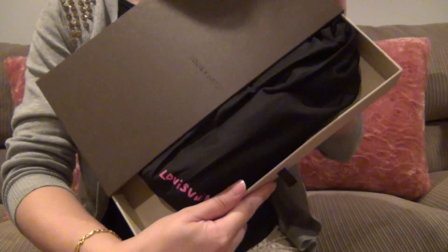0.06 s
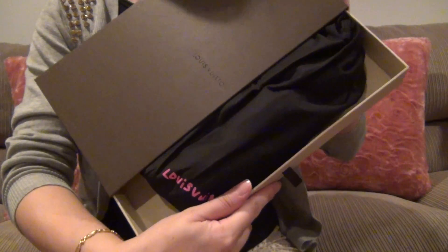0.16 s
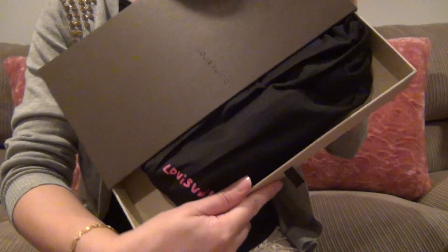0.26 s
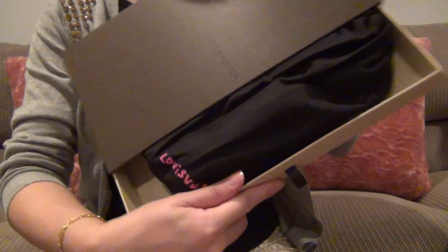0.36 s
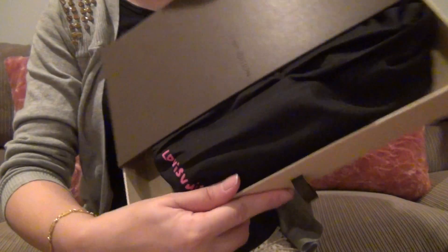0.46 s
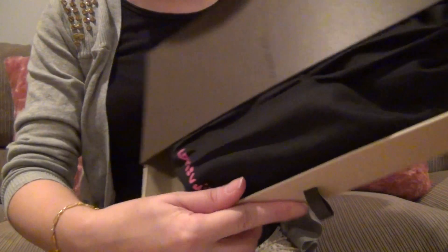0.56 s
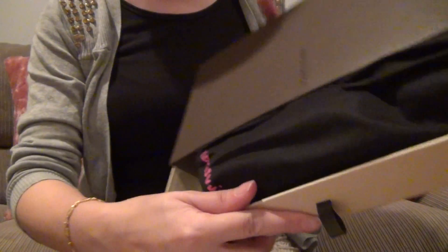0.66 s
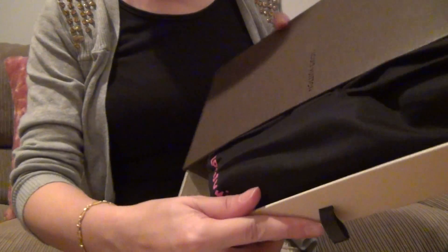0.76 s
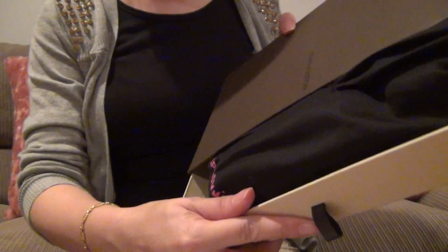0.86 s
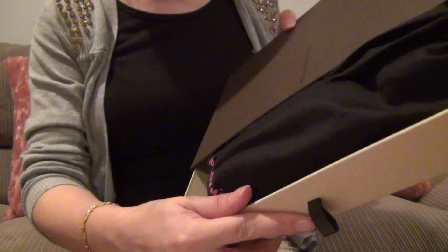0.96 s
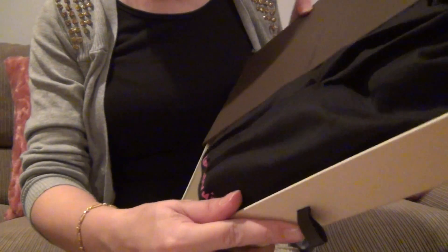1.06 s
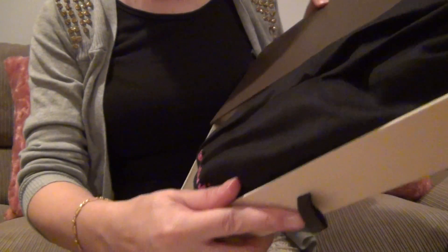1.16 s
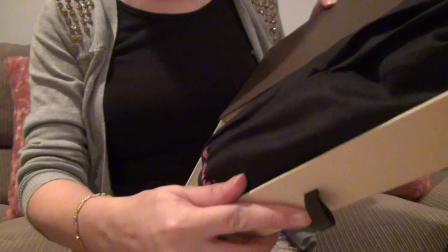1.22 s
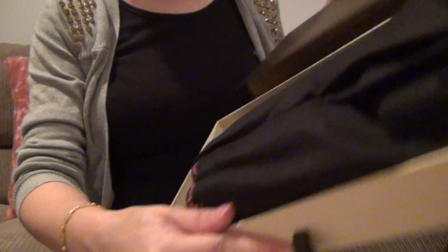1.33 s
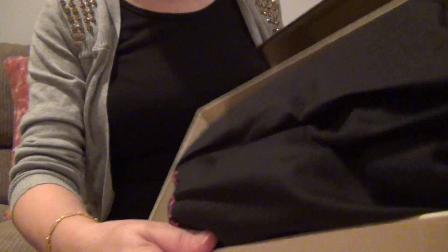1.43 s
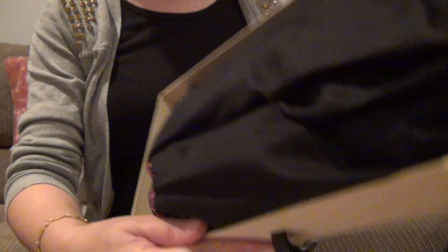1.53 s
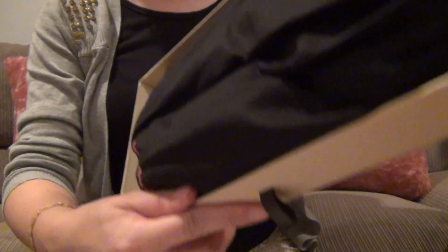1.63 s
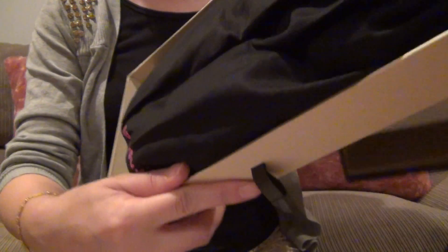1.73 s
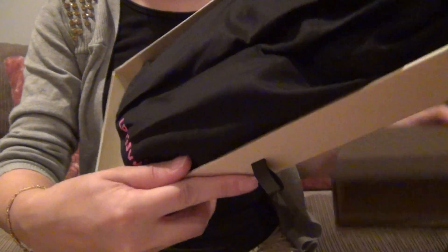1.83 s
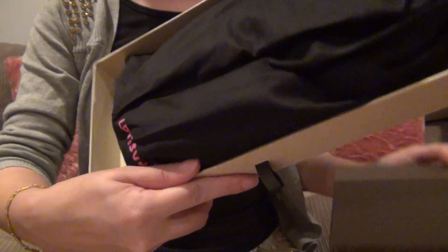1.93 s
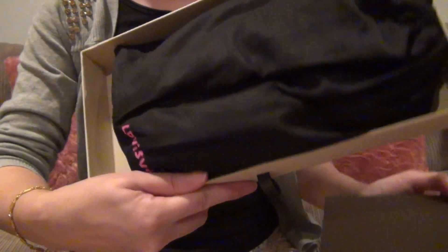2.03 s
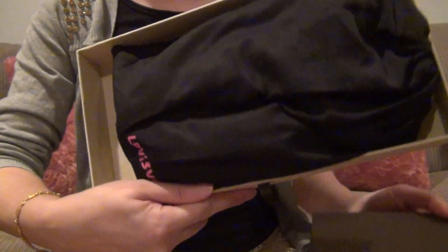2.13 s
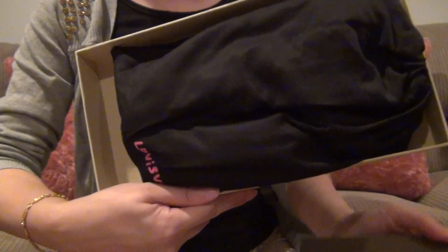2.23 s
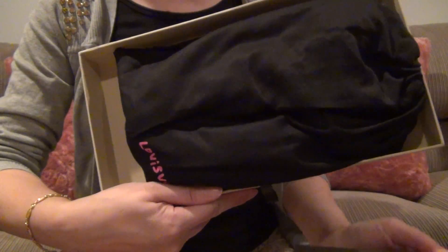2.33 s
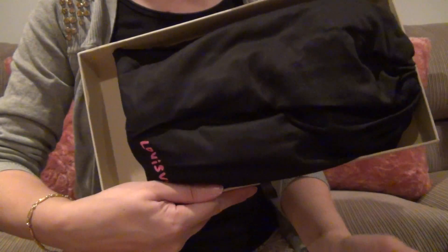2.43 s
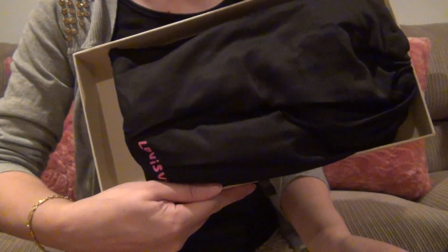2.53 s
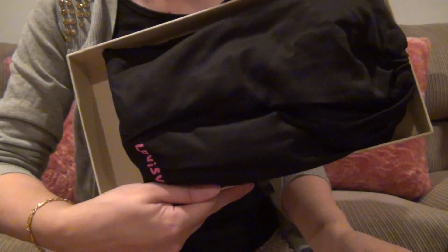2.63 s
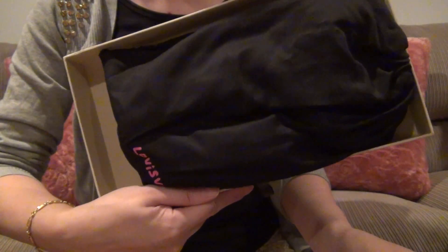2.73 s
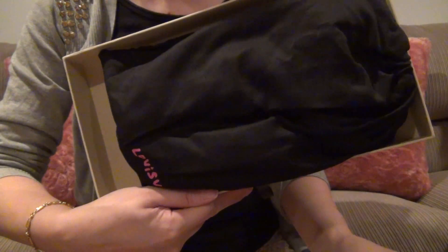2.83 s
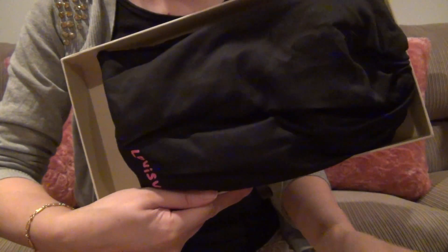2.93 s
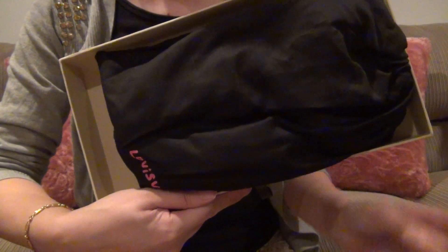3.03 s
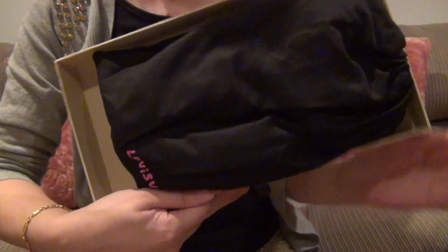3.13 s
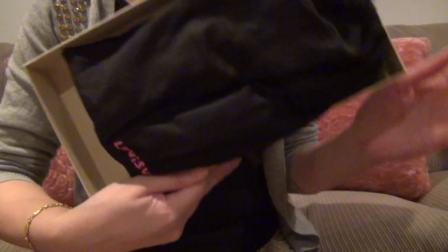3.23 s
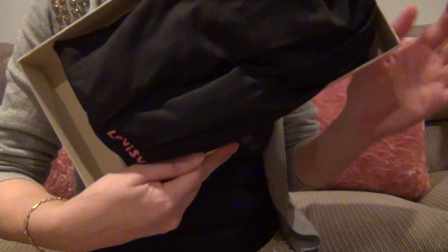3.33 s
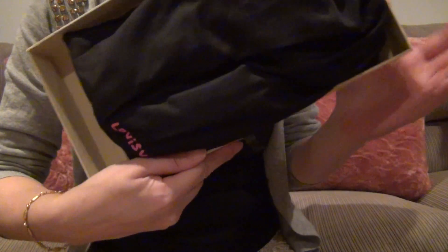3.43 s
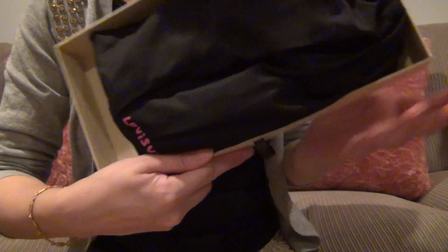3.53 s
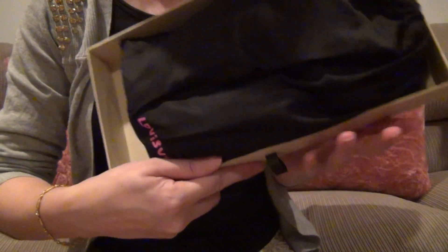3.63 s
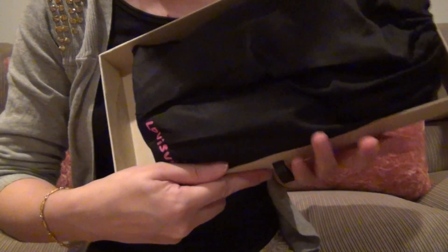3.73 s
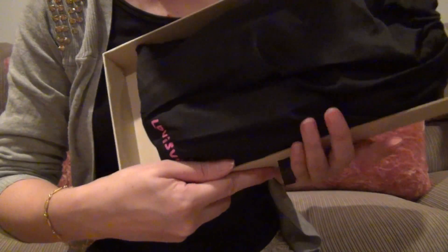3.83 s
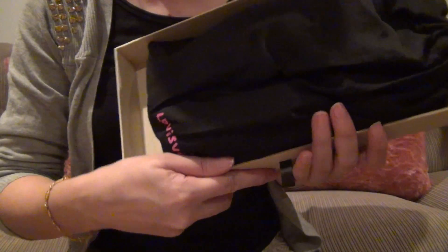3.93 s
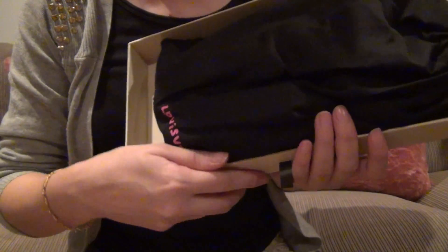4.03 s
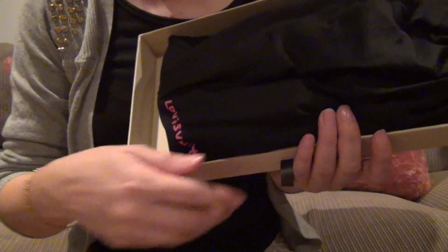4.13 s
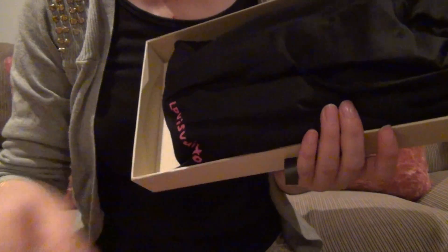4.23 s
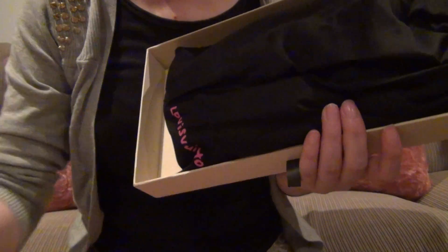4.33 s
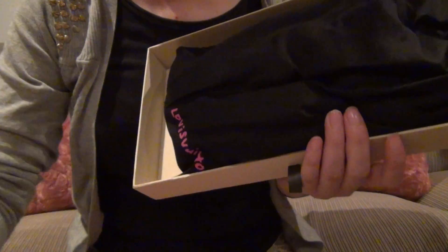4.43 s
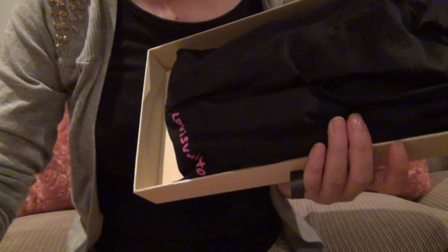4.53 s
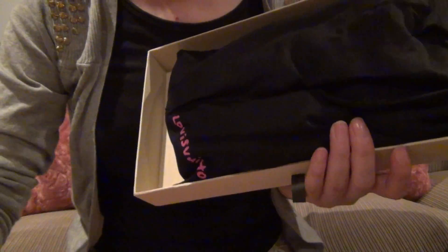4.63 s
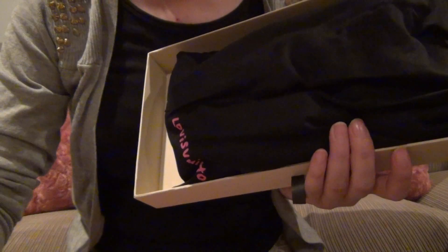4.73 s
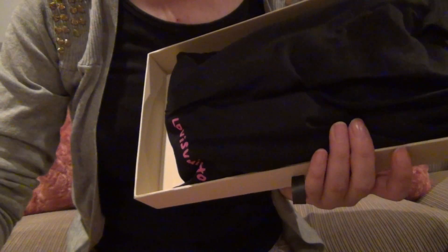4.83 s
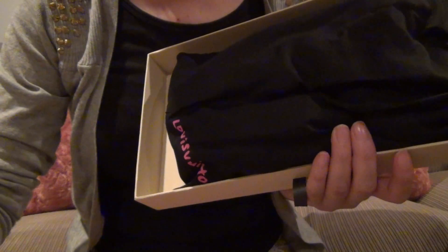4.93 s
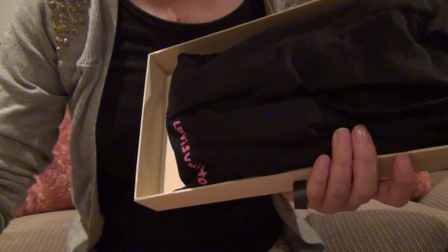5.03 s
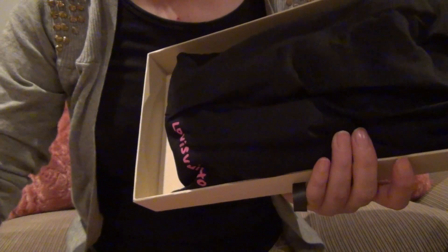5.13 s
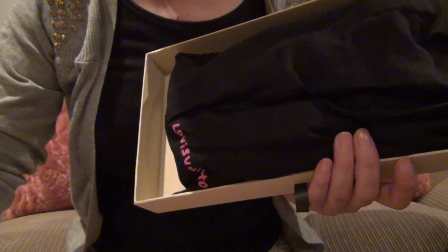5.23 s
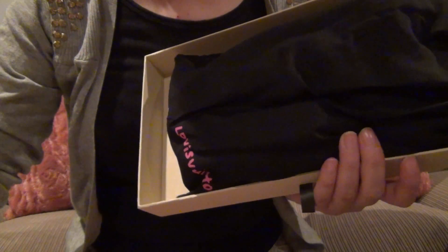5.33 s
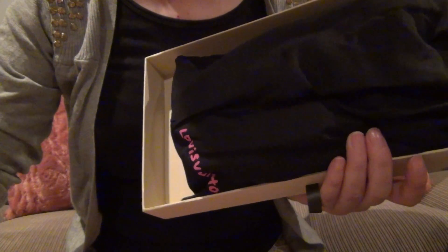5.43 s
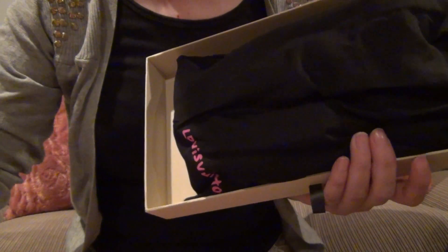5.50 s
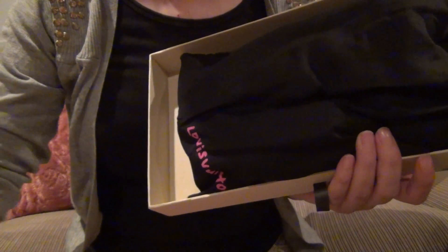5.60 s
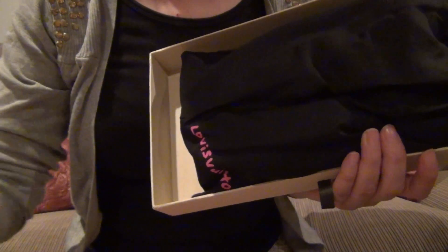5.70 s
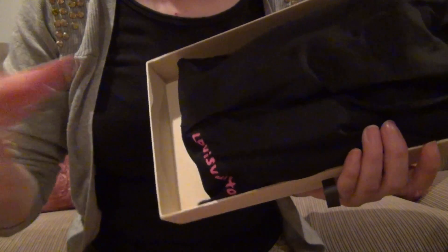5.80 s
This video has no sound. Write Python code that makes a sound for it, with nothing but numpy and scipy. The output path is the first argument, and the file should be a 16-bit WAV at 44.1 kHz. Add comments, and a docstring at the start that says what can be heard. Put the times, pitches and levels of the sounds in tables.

```python
"""Fingers tap and rub a cardboard box on a lap; its lid slides off, is set down, rocks and drops; a sleeve brushes cloth.
Behind this a fan hums faintly and the microphone hisses in a quiet furnished room.
Taps and knocks ring the modes of box and lid, with a short noise crack on top.
Rubbing and cloth are crowds of tiny random clicks, coloured by filters and shaped stroke by stroke.
Feedback delays give the room echo; the background is coloured noise with narrow whines."""
import sys
import numpy as np
from scipy import signal
from scipy.fft import rfft, irfft, next_fast_len
from scipy.io import wavfile

SR = 44100
rng = np.random.default_rng(int(sys.argv[2]) if len(sys.argv) > 2 else 0)


def waveform_to_disk(signal):
    """Save audio, clipped to [-1, 1], as 16-bit WAV at the path in sys.argv[1]."""
    frames = np.transpose(np.atleast_2d(signal))
    scaled = np.clip(frames, -1, 1) * 32767
    samples = np.round(scaled).astype(np.int16)
    wavfile.write(sys.argv[1], SR, samples)


N = 258426  # length in samples
GAIN_STEP = 32  # samples between the points of a stroke's gain curve


def from_db(db):
    """Gain of a level in dB."""
    return 10 ** (np.asarray(db) / 20)


def rms_one(x):
    """Scale to unit rms, the usual measure of average strength."""
    return x / np.sqrt(np.mean(x ** 2) + 1e-20)


def coloured(x, points):
    """Shape a steady signal by a spectrum of (f/Hz, level/dB) points; rms 1."""
    size = next_fast_len(N)
    hz = np.maximum(np.arange(size // 2 + 1) * SR / size, 1)
    point_hz, point_db = np.transpose(points)
    gain = from_db(np.interp(np.log(hz), np.log(point_hz), point_db))
    return rms_one(irfft(rfft(x, size) * gain, size)[..., :N])


def panned(x, pan_db):
    """Two channels with a left-right level difference."""
    return np.array([x * from_db(pan_db / 2), x * from_db(-pan_db / 2)])


def ring(clicks, hz, t60):
    """A unit click sets off a sine that starts at height 1 and dies by 60 dB in t60 seconds."""
    r = from_db(-60 / (t60 * SR))
    w = 2 * np.pi * hz / SR
    return signal.lfilter([0, np.sin(w)], [1, -2 * r * np.cos(w), r * r], clicks + 1e-18)


def drift(rate_hz):
    """Smooth random wandering of spread 1; a higher rate wanders faster."""
    r = np.exp(-2 * np.pi * rate_hz / SR)
    noise = rng.standard_normal(N + SR)
    # the first second is dropped so that the filter has settled
    return rms_one(signal.lfilter([1], [1, -2 * r, r * r], noise)[SR:])


def grains(per_s, spread_db, lumps_db):
    """Fibres catching and slipping: random clicks of uneven size, in lumps."""
    size_db = spread_db * np.minimum(rng.exponential(1, N), 4) + lumps_db * drift(56.0)
    signs = rng.choice([-1, 1], N)
    return from_db(size_db) * signs * (rng.random(N) < per_s / SR)


def wide(spectrum, per_s, spread_db, lumps_db, side_db):
    """Grains of a spread-out contact: a part shared by both channels, a weaker one in opposition."""
    mid = coloured(grains(per_s, spread_db, lumps_db), spectrum)
    side = from_db(side_db) * coloured(grains(per_s, spread_db, lumps_db), spectrum)
    return np.array([mid + side, mid - side])


def patchy(x, patch_db):
    """The contact wanders over the surface: each part of the treble swells and fades on its own."""
    edges = np.geomspace(2000, 17000, 8)  # Hz, seven bands
    total = 0
    for k, pair in enumerate(zip(edges, edges[1:])):
        band = signal.sosfilt(signal.butter(2, pair, "band", fs=SR, output="sos"), x)
        total = total + band * from_db(patch_db * drift(16.9)) * (-1) ** k
    return rms_one(total)


def strokes(rows, level_db, lingers=1):
    """Each stroke swells by 20 dB in its rise time, holds, and fades by 20 dB in fall times lingers."""
    at, rise, hold, fall = np.transpose(rows)[:4, :, None]
    t = np.arange(0, N + GAIN_STEP, GAIN_STEP) / SR
    before = np.maximum(at - t, 0) / rise
    after = np.maximum(t - at - hold, 0) / (fall * lingers)
    down = before ** 2 + after
    return from_db(np.asarray(level_db)[:, None] - 20 * np.minimum(down, 9))


def summed(gains):
    """Strokes add in power; the gain is read at every sample."""
    total = np.sqrt(np.sum(gains ** 2, axis=0))
    return np.interp(np.arange(N) / GAIN_STEP, np.arange(gains.shape[1]), total)


def crack(noise, crack_hz, crack_s):
    """Two surfaces meet: a short noise burst with a faint tail, dulled at the top by the soft board."""
    n = np.arange(len(noise))
    burst = noise * (np.exp(-n / (crack_s * SR)) + 0.035 * np.exp(-n / (0.004 * SR)))
    edges = [crack_hz / 2.3, crack_hz * 1.52]
    burst = signal.sosfilt(signal.butter(1, edges, "band", fs=SR, output="sos"), burst)
    return signal.lfilter(*signal.butter(1, crack_hz * 3.42, fs=SR), burst)


def struck(events, modes, spread_db, rise_cycles, top_db, crack_hz, crack_s, lead_s, hollow):
    """Each blow rings every mode with its own random strength, and adds a short crack."""
    s, peak_db, thud_db, hollow_db, edge_db, crack_db, pan_db = np.transpose(events)
    at = np.round(s * SR).astype(int)
    luck = rng.standard_normal((len(s), len(modes)))
    out, sides = np.zeros((2, N)), panned(np.ones(len(s)), pan_db)
    for k, (hz, level_db, t60) in enumerate(modes):
        if hz > 1750:  # the top modes follow the strength of the crack
            region_db = crack_db - peak_db + top_db
        elif hz > 900:
            region_db = edge_db
        elif hz < 295:
            region_db = thud_db
        elif hollow[0] < hz < hollow[1]:  # air inside the hollow
            region_db = hollow_db
        else:
            region_db = 0
        blow_db = peak_db + region_db + level_db + spread_db * luck[:, k]
        clicks = np.zeros((2, N))
        clicks[:, at] = sides * from_db(blow_db) * (-1) ** k
        # the soft board takes time to spread the blow: each mode swells before it dies
        swell_t60 = np.log(1000) * rise_cycles / hz
        out += ring(ring(clicks, hz, t60), hz, swell_t60) * 2 * hz / (rise_cycles * SR)
    start = at - round(lead_s * SR)  # the surfaces crack just before the panels answer
    length = SR // 25
    for i, noise in enumerate(rng.standard_normal((len(s), length))):
        burst = crack(noise, crack_hz, crack_s)
        out[:, start[i]:start[i] + length] += np.outer(sides[:, i], burst) * from_db(crack_db[i])
    return out


def quiet_room():
    """Steady room and microphone noise, partly alike in both channels, with narrow whines."""
    # how alike left and right are: f/Hz, likeness (1 = the same)
    likeness = [(60, 1), (180, 0.96), (550, 0.58), (1650, 0.51), (4970, 0.33), (15000, 0.98)]
    # colour of room and microphone noise: f/Hz, level/dB
    quiet_colour = [(12, -41), (20, -28.5), (60, 0), (81, -12), (147, -6), (403, -10), (438, -11),
                    (548, -9.5), (596, -13), (883, -7.5), (1020, -14), (1640, -17), (16400, -26)]
    # whines of fan and electronics: f/Hz, width/Hz, level/dB
    whines = [(881.5, 15, -67.5), (2542, 36.8, -74.5), (15734, 6, -75)]
    size = next_fast_len(N)
    hz, alike = np.transpose(likeness)
    bin_hz = np.arange(1, size // 2 + 2) * SR / size
    alike = np.interp(np.log(bin_hz), np.log(hz), np.clip(alike, -1, 1))
    noise = rfft(rng.standard_normal((2, N)), size)
    mid, side = irfft(noise * np.sqrt([1 + alike, 1 - alike]), size)[:, :N]
    out = from_db(-54.5) * coloured(np.array([mid + side, mid - side]), quiet_colour)
    for hz, width_hz, level_db in whines:
        t60 = np.log(1000) / np.pi / width_hz  # a narrow whine is a long ring
        out += from_db(level_db) * rms_one(ring(rng.standard_normal(N), hz, t60))
    return out


def rubbing():
    """Slips of board and skin over board drum the panels, scrape and hiss."""
    # strokes: full at t/s, rise/s, hold/s, fall/s, drumming of the panels/dB, scrape/dB, hiss/dB,
    # left-right difference/dB
    rubs = [(0.09, 0.018, .021, .21, -56, -68, -62, 0),
            (0.315, 0.047, 0.085, 0.12, -52.5, -59.5, -59, -0.5),
            (0.694, .021, 0.016, 0.1, -50, -61, -53.5, -1),
            (0.802, 0.073, 0.049, 0.072, -58, -72, -57, -1.5),
            (1.03, 0.066, 0.034, .06, -40, -45.5, -39.5, -1),
            (1.111, 0.088, 0.057, 0.034, -36, -39, -35.5, -0.8),
            (1.272, 0.033, 0.033, 0.048, -33, -36, -35.5, -0.5),
            (1.331, 0.015, 0.015, 0.014, -33, -31, -34.5, -2.5),
            (1.36, 0.023, .021, 0.12, -41.5, -45, -55, 0), (1.459, .09, 0.034, 0.052, -52, -59.5, -47, -2),
            (2.296, 0.012, 0.15, 0.096, -44, -42.5, -54.5, -2.5),
            (2.464, 0.093, 0.056, .04, -41, -46.5, -46.5, -2),
            (2.562, 0.035, 0.037, 0.13, -42, -44, -43.5, -2.5),
            (2.66, 0.058, 0.051, 0.022, -39, -41.5, -42, -2.5),
            (2.816, 0.043, 0.013, .015, -42, -48.5, -40, -2.5),
            (2.825, .015, 0.047, 0.057, -24, -34.5, -50, -4),
            (2.96, 0.05, 0.031, 0.13, -46.5, -53.5, -66, 1.5),
            (3.164, .011, 0.069, 0.048, -54, -60, -48.5, -0.5),
            (3.67, 0.013, 0.0096, .11, -57, -58.5, -49.5, -2),
            (3.829, 0.057, 0.0094, .08, -62, -55.5, -46.5, -1),
            (3.953, 0.099, 0.065, 0.093, -60, -60, -52.5, -1),
            (4.082, 0.038, .03, 0.069, -63, -56, -47, -0.5), (5.332, .011, 0.013, .04, -64, -55, -61, 4),
            (5.612, 0.028, 0.014, .05, -73, -63, -55.5, 5)]
    # colour of the drumming panels: f/Hz, level/dB
    drum_colour = [(18, -53.5), (30, -40.5), (82, -21), (152, -23), (185, -9), (395, -4.5), (468, -5.5),
                   (637, -9), (982, -16), (1200, -11.5), (1560, -20.5), (2640, -120)]
    # colour of the scrape: f/Hz, level/dB
    scrape_colour = [(470, -14), (800, -9.5), (1360, -1), (1870, 1), (2120, -8), (2630, -7), (5000, -27.5),
                     (6500, -23), (11000, -120)]
    # colour of board hissing on board: f/Hz, level/dB
    board_colour = [(2350, -3.5), (4000, -5.5), (4350, -5.5), (5100, -5.5), (5880, -6.5), (10800, -6),
                    (15500, -14.5)]
    # colour of a palm hissing on board: f/Hz, level/dB
    palm_colour = [(2350, -11), (4000, -5), (4380, -7.5), (5280, -10.5), (5780, -7), (6510, -5.5),
                   (8030, -1), (9410, -4), (11900, -4), (15500, -14)]
    palm_from_s = 3.6  # from here on only the hands move over the box
    drum_lingers, scrape_lingers = 1.88, 1.6  # fall time, as a multiple of that of the hiss

    drum_db, scrape_db, hiss_db, pan_db = np.transpose(rubs)[4:]
    drum = wide(drum_colour, 4700, spread_db=3.0, lumps_db=2.0, side_db=-27.5)
    scrape = wide(scrape_colour, 9000, spread_db=2.5, lumps_db=1.0, side_db=-14.5)
    board = wide(board_colour, 15000, spread_db=2.0, lumps_db=1.0, side_db=-10.5)
    palm = wide(palm_colour, 8700, spread_db=4.0, lumps_db=0.0, side_db=-14)
    board, palm = patchy(board, patch_db=2.04), patchy(palm, patch_db=4.5)
    hiss = np.where(np.arange(N) < palm_from_s * SR, board, palm)
    out = np.zeros((2, N))
    for level_db, lingers, sound in [(drum_db, drum_lingers, drum), (scrape_db, scrape_lingers, scrape),
                                     (hiss_db, 1, hiss)]:
        left = summed(strokes(rubs, level_db + pan_db / 2, lingers))
        right = summed(strokes(rubs, level_db - pan_db / 2, lingers))
        out += sound * np.array([left, right])
    return out


def box_taps():
    """Touches on the held box ring its panels and the air inside it."""
    # touches: t/s, strength/dB, then thud/dB and edge/dB relative to the strength, crack/dB,
    # left-right difference/dB
    touches = [(0.094, -35, -22.5, -16, -42.5, 0.5), (0.21, -45.5, -21, -20, -56, 0),
               (0.274, -48, -13, -7, -52, 1), (0.297, -40, -13, -6, -43, -1),
               (0.331, -45, -4.5, -12, -39, -1), (0.384, -38, -17, -27, -52, 0),
               (0.428, -46, -13, -24, -54, 1), (0.522, -58.5, 4.5, -5, -57, 0),
               (0.634, -38, -16, -17, -57, -0.5), (0.699, -21, -15, -19.5, -39, 0.8),
               (0.729, -48, 3, -10, -57, 1), (0.787, -42.5, -8, -16, -52, -1),
               (0.919, -48, -1.5, -10, -54, 0), (1.256, -48, 2, 5, -37, -1.5), (1.284, -27, -9, -2, -33, 3),
               (1.293, -10, -24, -6.5, -17, -5), (1.301, -17.5, -32, -6, -23, 5),
               (1.33, -28, -26, 8, -25, -4), (1.349, -30, -19, -1, -22.5, 4),
               (1.401, -35.5, -21, -13, -43, -4), (1.561, -47, -21, -3, -37.5, 2),
               (1.596, -47, -12, -4, -41, 0), (3.225, -19, -11.5, -9.5, -41, -2),
               (3.622, -27.5, -8, -15, -45, 0), (3.998, -60, -5, 3, -43.5, 0),
               (4.087, -52, -21, -1, -36, -3), (4.101, -70, -21, -9, -34, 1.5),
               (4.172, -40, -12, -21, -59, -2), (4.299, -52, -22, -11, -43.5, 0),
               (4.604, -55, -3, 2, -49, 3), (5.335, -56.5, -4, 0, -40, 4), (5.492, -62, -5, 13, -43.5, 5),
               (5.671, -51, -14, 1.5, -42, 6)]
    # modes of the box: f/Hz, level/dB, time to die by 60 dB/s
    box_modes = [(91, -8.5, 0.19), (130, -8.5, 0.24), (158.2, -4, 0.25), (195.4, -4.5, 0.16),
                 (240.2, 1.5, 0.18), (277.4, 1, 0.12), (342.3, 4, 0.082), (422, 3, 0.084),
                 (565, -3.5, 0.048), (570.6, -7, 0.077), (695, -7, 0.043), (910, -22, 0.1),
                 (1020, -10.5, 0.066), (1428, 1.5, 0.022), (1830, -13.5, 0.059), (2230, -14.5, 0.044),
                 (2764, -14.5, 0.035)]
    # the air of the filled box sounds 8 dB below the strength of a touch
    touches = np.insert(np.array(touches), 3, -8, axis=1)
    return struck(touches, box_modes, spread_db=4.5, rise_cycles=0.35, top_db=1, crack_hz=3040,
                  crack_s=0.0053, lead_s=0.0009, hollow=(320, 460))


def lid_knocks():
    """The lid knocks as it is set down, rocks, drops and settles, ringing its own modes."""
    # knocks: t/s, strength/dB, then thud/dB, hollow/dB and edge/dB relative to the strength, crack/dB,
    # left-right difference/dB
    knocks = [(2.119, -72, -25, -8, -10, -37, -3), (2.142, -31, -29, -9.5, -13, -31.5, -2),
              (2.293, -8, -16, -8.5, -3.5, -13, -4.5), (2.31, -20, -17, -28.5, -20.5, -33.5, -3.5),
              (2.354, -11.5, -21, -0.5, -4.5, -16.5, -4), (2.415, -10.5, -18.5, 0, -7, -18.5, -4.5),
              (2.477, -29, -10.5, 1, -12, -40, 1.5), (2.548, -33, -32.5, 1.5, -8, -34, -5.5),
              (2.603, -29, -27, 2, -5, -37, -3.5), (2.773, -37.5, -29.5, -3.5, -8.5, -47.5, -1),
              (2.815, -26.5, 6.5, -12.5, -21, -34, -4), (2.822, -20.5, -20, -24, 0, -38, -3.5),
              (2.832, -10.5, -3, -7.5, -9, -12.5, -4.5), (2.841, -3.5, -12, -10.5, -21.5, -35, 1.5),
              (2.857, -10.5, -32.5, -9, -9.5, -17.5, -7), (2.864, -18, -28, -2, -1, -16.5, 2),
              (2.871, -2.5, -39, -20, -18.5, -28, -4.5), (2.881, -13.5, -40, -4, -1.5, -15.5, -4.5),
              (2.895, -23.5, -32, 6.5, -12, -29, -2), (2.909, -21, -5, -10, -7, -33, -1.5),
              (3.085, -35, -6, 0.5, -21, -60, -2.5), (3.16, -36.5, -2, -8, -19, -45, 2),
              (3.417, -44.5, -9.5, -4, -19, -60, 0), (3.477, -42.5, -25, -17, -8.5, -44.5, 0)]
    # modes of the lid: f/Hz, level/dB, time to die by 60 dB/s
    lid_modes = [(55.9, -25, 0.22), (95, -12, 0.12), (131.3, -4.5, 0.19), (185.3, -0.5, 0.19),
                 (256.7, 6, 0.1), (294.9, -3.5, 0.18), (355, -6.5, 0.069), (477.7, 4.5, 0.097),
                 (524.4, -0.5, 0.1), (601, -11, 0.071), (661, -22.5, 0.14), (740.7, -10, 0.087),
                 (839, -17.5, 0.0684), (1123, 1, 0.016), (1351, -2.5, 0.047), (1560, -3.5, 0.0261),
                 (1703, -8, 0.031), (1980, -8, 0.016), (2314, -12.5, 0.0168), (2822, -17.5, 0.0159)]
    return struck(knocks, lid_modes, spread_db=4.0, rise_cycles=0.15, top_db=-1.0, crack_hz=2770,
                  crack_s=0.0027, lead_s=0.00067, hollow=(430, 570))


def lid_shudder():
    """The lid shudders on the seat when set down and when dropped: low noise, the same in both channels."""
    # shudders: full at t/s, rise/s, hold/s, fall/s, level/dB
    shudders = [(2.301, 0.02, 0.18, 0.33, -38), (2.82, .04, 0.021, 0.205, -36)]
    # colour of the seat: f/Hz, level/dB
    seat_colour = [(20, -8), (50, -3.5), (95, 9.5), (140, -6.5), (300, -47.5)]
    gain = summed(strokes(shudders, np.transpose(shudders)[4]))
    return gain * coloured(rng.standard_normal(N), seat_colour)


def sleeve():
    """Short bright brushes of sleeve over cloth, with lumps where it snags."""
    # brushes: full at t/s, rise/s, hold/s, fall/s, level/dB
    brushes = [(4.849, .021, .132, .015, -39.5), (4.998, .011, 0.052, .03, -50.5)]
    # snags of the cloth: start t/s, level at the top of the lump/dB
    snags = [(3.476, -54), (4.598, -43.5), (4.846, -42), (4.895, -38.5), (4.917, -35), (4.947, -36.5),
             (4.971, -40.5), (5.099, -51), (5.388, -54), (5.617, -59)]
    # colour of the cloth: f/Hz, level/dB
    cloth_colour = [(2060, -40), (3500, -23.5), (4810, -23), (5720, -16.5), (6250, -17.5), (8160, -13),
                    (10500, -2.5), (11700, -2.5), (15500, -9.5)]
    snag_s = 0.0023  # time a snag takes to reach its top
    gain = summed(strokes(brushes, np.transpose(brushes)[4]))
    for s, peak_db in snags:
        late = np.maximum(np.arange(N) / SR - s, 0) / snag_s
        gain = gain + from_db(peak_db) * late * np.exp(1 - late)
    cloth = wide(cloth_colour, 15000, spread_db=4.0, lumps_db=2.0, side_db=-12.5)
    return gain * patchy(cloth, patch_db=2.5) * panned(np.ones(1), 2)


def room(x):
    """Room echo: eight feedback delays a side, duller on every round."""
    t60_s, wall_cut_hz = 0.4, 2380
    size = next_fast_len(N + SR)
    bins = np.arange(size // 2 + 1)
    one_sample = np.exp(-2j * np.pi * bins / size)  # delay by one sample, as a spectrum
    dull = np.exp(-2 * np.pi * wall_cut_hz / SR)
    wall = (1 - dull) / (1 - dull * one_sample)
    tails = np.zeros((2, len(bins)), complex)
    lags = (rng.uniform(.008, .03, 16) * SR).astype(int)
    for k, lag in enumerate(lags):
        loop = from_db(-60 * lag / SR / t60_s) * wall * np.exp(-2j * np.pi * bins * lag / size)
        tails[k % 2] += loop / (1 - loop) * (-1) ** (k // 2)
    return irfft(rfft(x, size) * tails, size)[:, :N]


def scene():
    """Handling close to the microphone, its echo, the quiet room."""
    near = rubbing() + box_taps() + lid_knocks() + lid_shudder() + sleeve()
    echo = from_db(-23.5) * room(near.mean(axis=0))
    return near + echo + quiet_room()


def record(dry):
    """Peaks are rounded, and everything above 15.8 kHz is cut steeply."""
    rounded = .95 * np.tanh(dry / .95)
    return signal.sosfilt(signal.ellip(14, .5, 70, 15800, fs=SR, output="sos"), rounded)


dry = scene()
out = record(dry)
waveform_to_disk(out)
```